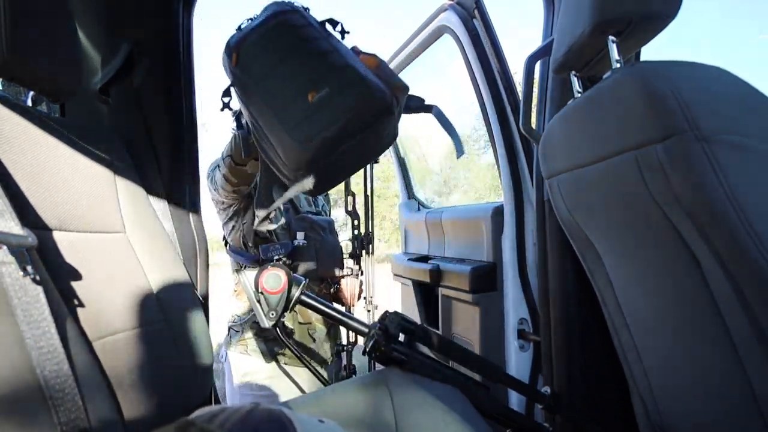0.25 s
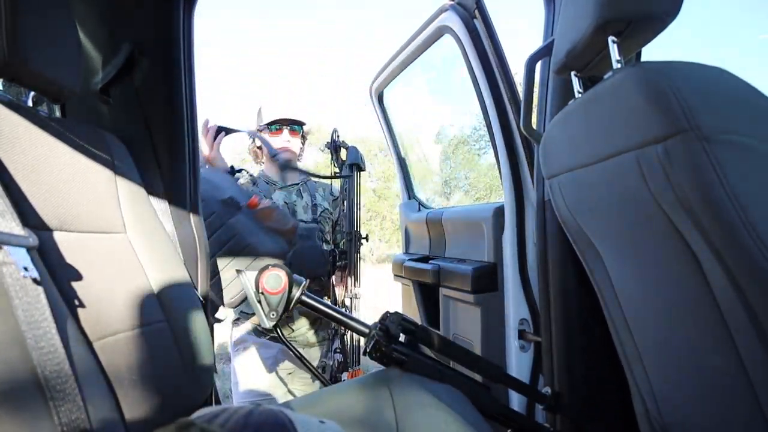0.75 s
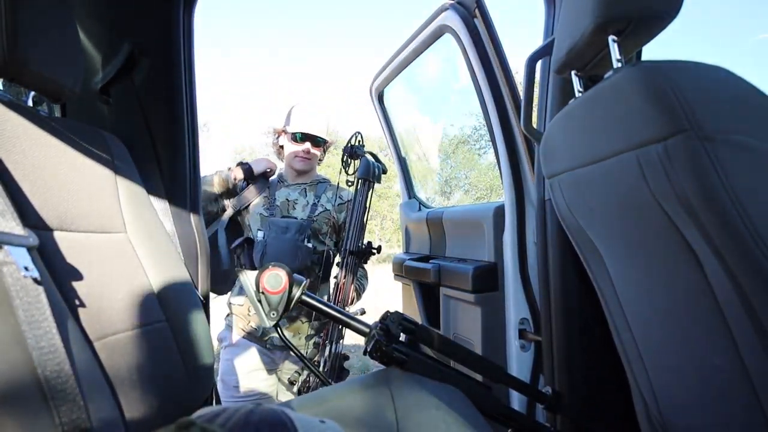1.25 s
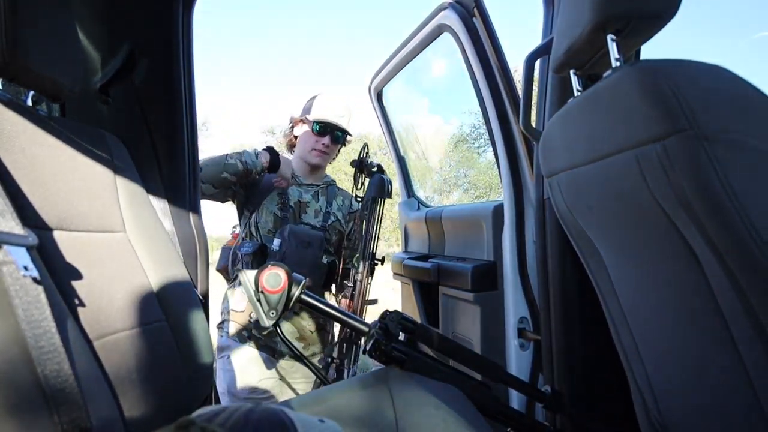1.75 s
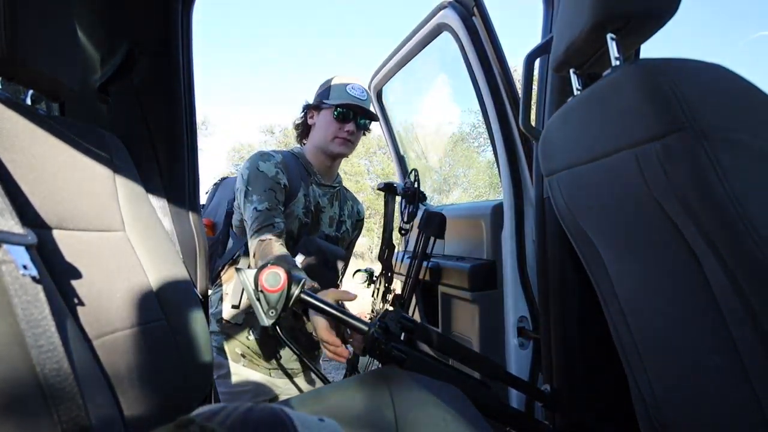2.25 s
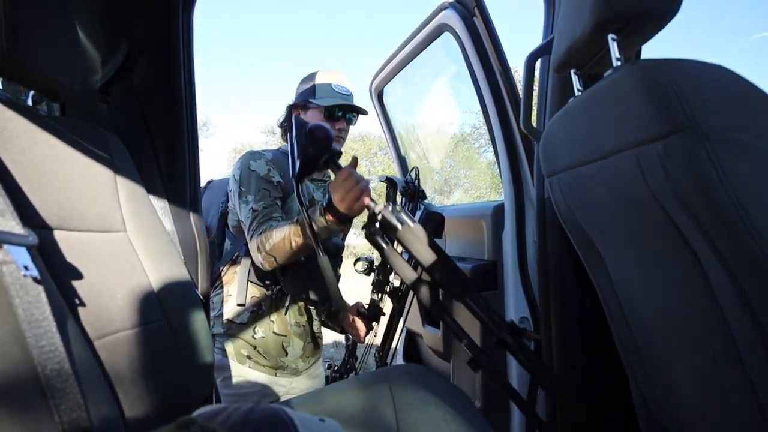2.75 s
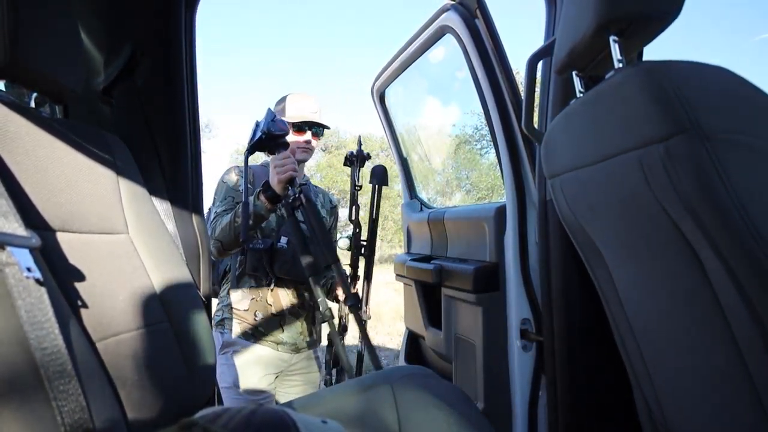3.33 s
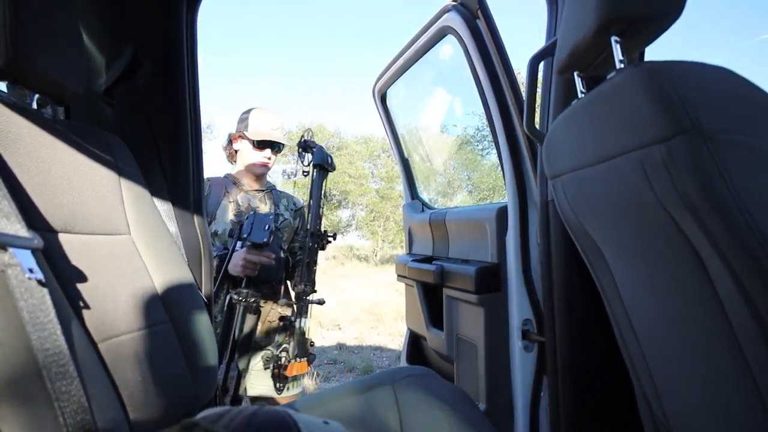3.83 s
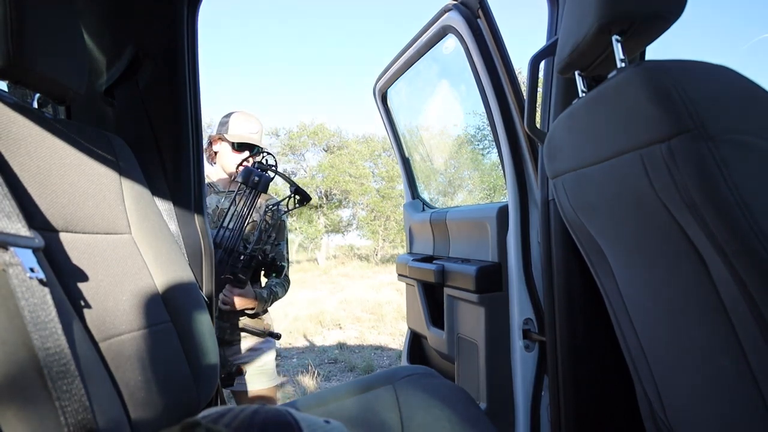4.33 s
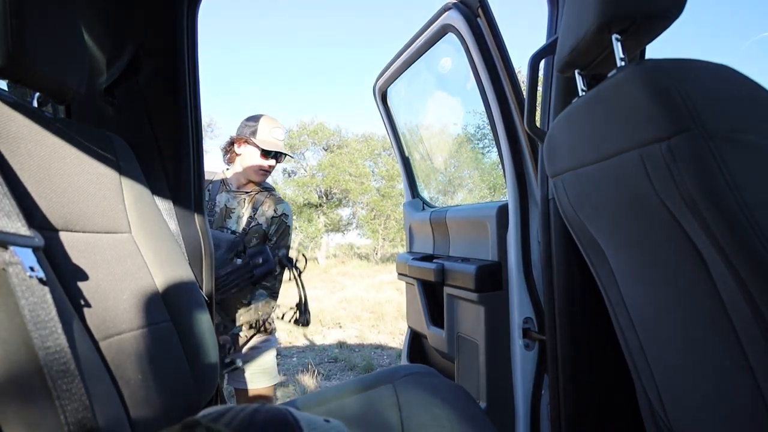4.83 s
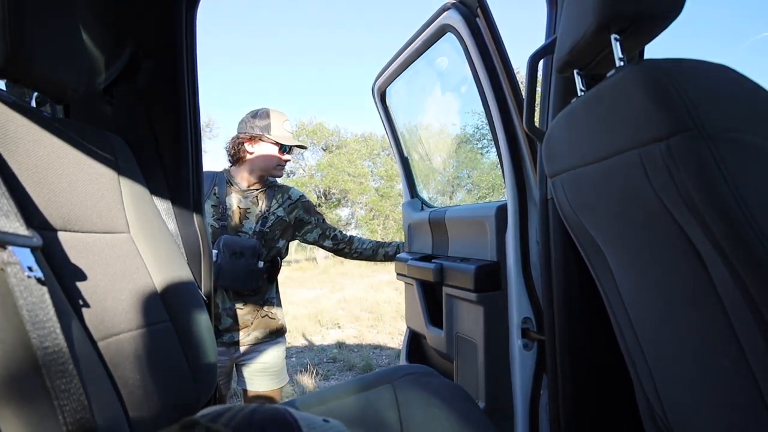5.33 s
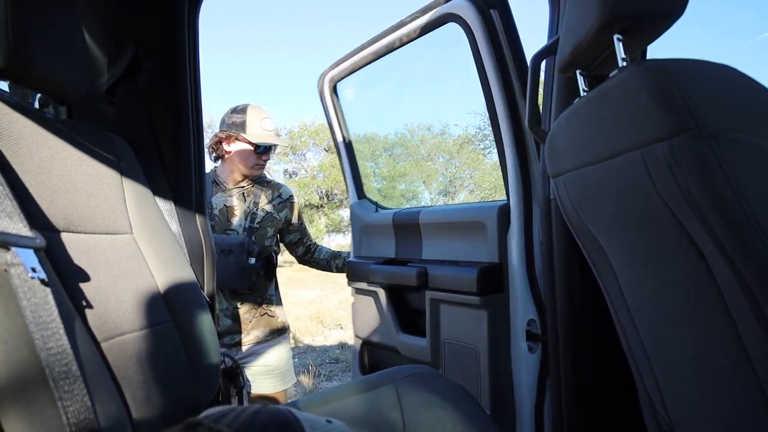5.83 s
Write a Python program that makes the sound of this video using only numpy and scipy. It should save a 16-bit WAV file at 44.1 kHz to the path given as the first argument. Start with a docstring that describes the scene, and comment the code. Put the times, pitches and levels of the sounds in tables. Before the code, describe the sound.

Inside an upholstered pickup cab with the rear door open, a nylon pack is lifted out with rustles, strap rasps, buckle ticks and a dull knock. A tripod then clacks, scrapes over the seat and drops hard on the sill, leaving a low rumble. It taps the plastic trim; faint clothing rustle follows, and the door knocks and rumbles as it begins to move. Fixed microphone in the cab, quiet outdoor air.

```python
"""Gear is unloaded through the open rear door of a pickup, heard from inside the upholstered cab.
First a nylon pack is lifted out and shouldered: its cloth rubs in dense tiny slips, straps rasp as
narrow noise, and buckles tick as damped bursts. Then a tripod clacks in ringing modes, drags over the
seat as swelling friction, drops on the sill, rocks the cab and taps the door trim. Clothes rustle on;
last, a hand takes the door, which knocks and rumbles as it starts to swing. Quiet air lies under all."""
import sys
import numpy as np
from scipy import signal
from scipy.fft import rfft, irfft
from scipy.io import wavfile
from scipy.ndimage import uniform_filter1d

SR = 44100
rng = np.random.default_rng(int(sys.argv[2]) if len(sys.argv) > 2 else 0)


def transcribe(signal):
    """Save signal, clipped to [-1, 1], as a 16-bit WAV file at the path in sys.argv[1]."""
    frames = np.atleast_2d(signal).T
    limited = np.clip(frames, -1, 1)
    pcm = np.round(limited * 32767).astype(np.int16)
    wavfile.write(sys.argv[1], SR, pcm)


N = 268128
TIME = np.arange(N) / SR
RING_TIME = TIME[:SR // 2]  # every single hit lasts half a second


def undb(db):
    """Decibels to gain."""
    return 10 ** (np.asarray(db) / 20)


def unit(x):
    """Scale to rms 1."""
    return x / np.sqrt(np.mean(x ** 2))


def log_bins(x):
    """Octave position of each bin of the spectrum of x."""
    return np.log2(np.maximum(np.arange(len(x) // 2 + 1) * SR / len(x), 1))


def colour(x, points):
    """Filter x through a curve of (frequency [Hz], gain [dB]) points, then scale to rms 1."""
    hz, db = np.transpose(points)
    gain = undb(np.interp(log_bins(x), np.log2(hz), db))
    return unit(irfft(rfft(x) * gain, len(x)))


def decay(seconds, t60):
    """Exponential decay that falls 60 dB in t60 seconds."""
    return np.exp(-np.log(1000) * seconds / t60)


def fade(t60):
    """Decay of a struck thing from the moment of the hit."""
    return decay(RING_TIME, t60)


def band_noise(hz, octaves):
    """Noise in a bell around hz, with gentle skirts."""
    x = rng.standard_normal(len(RING_TIME))
    distance = (log_bins(x) - np.log2(hz)) / octaves
    return irfft(rfft(x) / (1 + distance ** 2 / 2) ** 2, len(x))


def add(out, s, db, x):
    """Mix in a hit at time s; db is its energy taken as an rms over 10 ms."""
    start = int(s * SR)
    x = x * undb(db) * np.sqrt(SR / 100 / np.sum(x ** 2))
    out[start:start + len(x)] += x[:N - start]


def walk(rate):
    """Smooth random wander of rms 1, with rate new values per second."""
    step = max(int(SR / rate), 1)
    values = np.repeat(rng.standard_normal(N // step + 1), step)[:N]
    return unit(uniform_filter1d(values, step))


def movement(start, length):
    """Gain of one hand or arm movement: smooth attack, hold, smooth release."""
    attack_s, release_s = 0.027, 0.042
    rise = 1 + np.tanh((TIME - start) / attack_s)
    fall = 1 - np.tanh((TIME - start - length) / release_s)
    return rise * fall / 4


def movements(table):
    """Summed gain of movements (start [s], length [s], level [dB])."""
    return sum(undb(db) * movement(start, length) for start, length, db in table)


def friction(points, slips_per_s, spread_db, patchy_db, smear_t60):
    """Dense tiny slips of uneven size, gripping and easing in patches, smeared by the nearby panels."""
    chance, size, sign = rng.random(N), rng.exponential(size=N), rng.choice([-1, 1], N)
    slips = (chance < slips_per_s / SR) * sign * undb(spread_db * np.minimum(size, 4))
    slips = slips * undb(patchy_db * walk(90))
    # slips come from eight places, each with its own short echo
    place = rng.integers(0, 8, N)
    smeared = np.zeros(N)
    for k in range(8):
        path = rng.standard_normal(len(RING_TIME)) * fade(smear_t60)
        smeared += signal.oaconvolve(slips * (place == k), path)[:N]
    return colour(smeared, points)


def struck(blows, modes, crack_db, crack_hz, crack_t60, scatter_db, scatter_t60):
    """Each blow rings the modes and cracks; seats and panels close by scatter it back."""
    out = np.zeros(N)
    for s, db, contact_ms in blows:
        ring = undb(crack_db) * unit(band_noise(crack_hz, 1.08)) * fade(crack_t60)
        for k, (hz, mode_db, t60) in enumerate(modes):
            # neighbouring modes start in opposite directions
            ring += (-1) ** k * undb(mode_db) * fade(t60) * np.sin(2 * np.pi * hz * RING_TIME)
        # a longer contact pushes more softly and dulls the treble
        keep = np.exp(-1000 / (SR * contact_ms))
        ring = signal.lfilter([1 - keep], [1, -keep], ring)
        # the first scattered sound returns after 1.5 ms
        scatter = rng.standard_normal(len(ring)) * fade(scatter_t60) * (RING_TIME > .0015)
        echo = signal.fftconvolve(ring, scatter / np.linalg.norm(scatter))[:len(ring)]
        add(out, s, db, ring + undb(scatter_db) * echo)
    return out


# colour that the cab and microphone lend to every click: (frequency [Hz], gain [dB])
CLICK_COLOUR = [(100, 0), (280, 4), (450, 3), (1200, 5.5), (1800, 0), (3100, 0.5), (3900, -0.5),
                (6500, 0.5), (9000, 1.5), (10500, -7.5), (15500, -2)]


def click(hz, octaves, t60):
    """A quickly damped noise burst with a faint cab tail."""
    tail_db, tail_t60 = -31, 0.12
    envelope = fade(t60) + undb(tail_db) * fade(tail_t60)
    return colour(band_noise(hz, octaves), CLICK_COLOUR) * envelope


def clicks(table, octaves, t60):
    """Play clicks (time [s], level [dB], centre [Hz]) of one width and damping."""
    out = np.zeros(N)
    for s, db, hz in table:
        add(out, s, db, click(hz, octaves, t60))
    return out


# still outdoor air and microphone hiss: (frequency [Hz], gain [dB])
AIR_COLOUR = [(15, -39.5), (25, 3), (164, 6.5), (290, -5), (469, 1.5), (523, -0.5), (848, 0), (1110, 1),
              (1380, -4), (2230, -16), (4260, -11.5), (8350, -11), (15500, -14)]


def air():
    """Quiet open country and hiss: coloured noise that barely swells."""
    level_db, swell_db = -59.5, 0.2
    swell = undb(level_db + swell_db * walk(3.33))
    return swell * colour(rng.standard_normal(N), AIR_COLOUR)


# strokes of cloth as the pack is lifted out and shouldered and its wearer turns to the door:
# (start [s], length [s], level of the scuffing [dB], brightness [dB])
CLOTH_STROKES = [(-.02, 0.081, -49.5, -1), (.08, 0.072, -50, -4), (0.152, 0.081, -45, -3),
                 (0.26, 0.1, -52.5, -3.5), (0.457, 0.051, -54, -5), (.558, 0.35, -49.5, 5.5),
                 (0.657, 0.056, -53, -13), (0.831, 0.075, -43, 5), (0.891, 0.073, -46.5, -5),
                 (1.002, 0.32, -52.5, 2.5), (1.063, .065, -50, 10), (1.203, .03, -49, 11.5),
                 (1.267, 0.045, -44.5, 2.5), (1.32, 0.25, -49, 0), (1.581, 0.091, -40, -4.5),
                 (1.682, 0.069, -46, 0.5), (1.829, 0.13, -50.5, 0), (3.317, 0.042, -50, 7.5),
                 (3.68, 0.088, -54.5, 2.5), (4.196, .1, -51, -3.5), (4.377, 0.2, -58.5, 1),
                 (4.623, .08, -50, -5.5), (5.405, .025, -57, -13), (5.531, 0.074, -53, -11),
                 (5.701, 0.17, -54, -6.5), (5.899, .09, -58, -6)]
# colours of flapping fabric, scuffing straps, swishing nylon and crackling creases:
# (frequency [Hz], gain [dB])
FLAP_COLOUR = [(40, -10), (80, -2), (190, 3.5), (350, 3), (600, -0.5), (1200, -4), (4000, -55)]
SCUFF_COLOUR = [(150, -22.5), (450, -6.5), (850, 0), (1200, 0.5), (1600, -3), (2200, -3), (3600, -15),
                (7000, -30), (16000, -57)]
SWISH_COLOUR = [(600, -28), (2000, -4.5), (3200, 2), (4200, 0), (5500, 2.5), (7000, -2), (8800, 0),
                (11000, -11), (15500, -11)]
CRACKLE_COLOUR = [(700, -8), (1600, 3.5), (3000, 1), (6500, -2.5), (9000, -3.5), (11000, -11),
                  (15500, -9.5)]


def cloth():
    """Fabric flaps, scuffs, swishes and crackles; a brighter stroke swishes more and flaps less."""
    # levels against the scuffing, in a stroke of brightness 0
    flap_db, swish_db, crackle_db = -4.5, -3.5, -13.5
    # clothes are never quite still
    fidget_db, fidget_swell_db = -59, -0.8
    fidget = undb(fidget_db + fidget_swell_db * walk(6.6))

    def layer_gain(lean):
        """Power sum of fidgeting and strokes; lean says how brightness acts on this layer."""
        power = fidget ** 2
        for start, length, db, bright_db in CLOTH_STROKES:
            power = power + (undb(db + lean * bright_db) * movement(start, length)) ** 2
        return np.sqrt(power)

    flap, scuff, swish = layer_gain(-1), layer_gain(0), layer_gain(1)
    out = undb(flap_db) * flap * friction(FLAP_COLOUR, 1500, 1.13, 1.6, smear_t60=0.017)
    out += scuff * friction(SCUFF_COLOUR, 1800, 1.9, 1.1, smear_t60=0.016)
    out += undb(swish_db) * swish * friction(SWISH_COLOUR, 4000, 1.5, 1.6, smear_t60=0.0073)
    # sparse slips let the creases crackle in single grains
    out += undb(crackle_db) * scuff * friction(CRACKLE_COLOUR, 139.7, 3.5, 1.53, smear_t60=0.008)
    return out


# plastic clips and gear tick: (time [s], level [dB], centre [Hz])
GEAR_TICKS = [(.003, -42, 2010), (0.166, -39.5, 1600), (0.376, -54, 1490), (.674, -43, 876),
              (.985, -40, 700), (1.2, -36, 1300), (1.357, -41, 1300), (1.4114, -41, 1660),
              (1.502, -42, 1300), (1.644, -34.5, 720), (2.2395, -51, 5900), (3.338, -46.5, 2200),
              (3.571, -45.5, 2500), (3.8618, -48.5, 2780), (4.394, -49, 1984), (4.8916, -48, 5500),
              (5.206, -48.5, 2700), (5.3398, -50, 2020)]


def gear_ticks():
    """Light plastic gives broad, quickly damped clicks."""
    return clicks(GEAR_TICKS, octaves=1.17, t60=0.063)


# straps sliding through their loops: (middle [s], length [s], level [dB], centre [Hz])
STRAP_SLIDES = [(0.01, 0.054, -48.5, 1410), (1.09, 0.045, -52.5, 950), (1.19, 0.34, -51.5, 1173),
                (1.286, 0.021, -40.5, 1201), (1.435, 0.12, -48, 1498)]


def straps(width_hz=230):
    """Webbing rasps in one narrow band while it slides: slow noise carried on a tone."""
    low_pass = signal.butter(1, width_hz / 2, fs=SR, output="sos")
    grain = unit(signal.sosfilt(np.vstack([low_pass, low_pass]), rng.standard_normal((2, N))))
    out = np.zeros(N)
    for s, length, db, hz in STRAP_SLIDES:
        near = np.abs(TIME - s) < 2 * length
        t = TIME[near]
        phase = 2 * np.pi * hz * t
        rasp = grain[0, near] * np.cos(phase) + grain[1, near] * np.sin(phase)
        out[near] += undb(db) * np.exp(-2 * ((t - s) / length) ** 2) * rasp
    return out


# metal fittings: (time [s], level of the click [dB], centre of the click [Hz], ring [Hz])
CLINKS = [(.052, -46, 11900, 15100), (.956, -42, 11100, 7850), (1.066, -44, 9050, 15000),
          (1.7706, -37, 2100, 1040), (1.987, -54, 8980, 8000), (2.106, -36, 2850, 4370),
          (2.139, -40.5, 3300, 10020), (5.572, -32.5, 6100, 6520)]


def clinks():
    """Metal fittings click and ring briefly on one pitch."""
    ring_db, ring_t60 = -2.5, 0.029  # ring level against the click
    out = np.zeros(N)
    for s, db, hz, ring_hz in CLINKS:
        add(out, s, db, click(hz, octaves=1.47, t60=0.036))
        add(out, s, db + ring_db, np.sin(2 * np.pi * ring_hz * RING_TIME) * fade(ring_t60))
    return out


# soft bumps of pack, tripod, feet and hand: (time [s], level [dB], pitch [Hz])
BUMPS = [(.226, -42.5, 224), (0.281, -42, 330), (.305, -34, 375), (.903, -39, 240), (0.937, -43, 196),
         (.984, -36, 200), (1.293, -45, 196), (1.501, -42.5, 185), (1.586, -41, 120), (1.65, -42, 304),
         (2.442, -37, 185), (2.579, -28.5, 105), (4.66, -48, 224), (4.716, -45, 209), (5.417, -37.5, 170),
         (5.575, -38.5, 242), (5.932, -37.5, 236)]


def bumps():
    """Soft contact gives a few low cycles with some noise, easing in and dying away."""
    t60 = .052
    out = np.zeros(N)
    for s, db, hz in BUMPS:
        body = np.sin(2 * np.pi * hz * RING_TIME) + 0.45 * unit(band_noise(hz, 1.0))
        add(out, s, db, body * (fade(t60) - fade(t60 / 4)))
    return out


def pack_knock():
    """The pack knocks once on its way out: a narrow burst with a fainter, higher snap."""
    at_s, t60 = .3055, .026
    body = clicks([(at_s, -27, 1150)], octaves=0.51, t60=t60)
    snap = clicks([(at_s, -44, 3300)], octaves=0.42, t60=t60)
    return body + snap


# the tripod is pulled over the seat ever louder until it drops on the sill
DRAG_START_S, DRAG_END_S, DRAG_ATTACK_S = 2.44, 2.689, 0.0067


def pull(rise_db_per_s, t60):
    """Gain of the pull on the tripod: it grows steadily to the landing, then dies away."""
    before = np.maximum(DRAG_END_S - TIME, 0)
    after = np.maximum(TIME - DRAG_END_S, 0)
    onset = np.clip((TIME - DRAG_START_S) / DRAG_ATTACK_S, 0, 1)
    return onset * undb(-rise_db_per_s * before) * decay(after, t60)


# colours of the rubbing and of the seat's rumble: (frequency [Hz], gain [dB])
RUB_COLOUR = [(100, -6.5), (350, 5), (800, 1), (1300, -3), (2000, -3.5), (3100, -6), (4200, -13.5),
              (8500, -18), (11000, -25.5), (16000, -30)]
RUMBLE_COLOUR = [(25, -49), (60, -10), (100, 4), (150, 0.5), (230, 1.5), (350, -11.5), (600, -32),
                 (2000, -46)]


def drag():
    """The tripod rubs over the seat in dense slips, and the seat rumbles under it."""
    rub_db, rumble_db = -28, -29  # levels at the end of the pull
    rub = undb(rub_db) * pull(rise_db_per_s=51, t60=.15)
    rumble = undb(rumble_db) * pull(rise_db_per_s=61.5, t60=0.32)
    return (rub * friction(RUB_COLOUR, 2200, 1.8, 2.63, smear_t60=0.031)
            + rumble * friction(RUMBLE_COLOUR, 2400, 1.0, 1.7, smear_t60=0.013))


# tripod legs clacking together, then the tubes ringing again as the tripod strikes the sill: (time [s], level
# before the bass cut [dB], contact time [ms])
LEG_HITS = [(2.4635, -9.5, 0.014), (2.474, -19, 0.026), (2.479, -27.5, 0.05), (2.6596, -19.5, 0.082),
            (2.6796, -26.5, 0.11)]
# ringing modes of the leg tubes: (frequency [Hz], level [dB], t60 [s])
LEG_MODES = [(850, -25, .08), (1603, -24, 0.07), (2040, -11.5, 0.064), (2210, 1, 0.027),
             (2678, -3.5, 0.035), (2740, -15.5, 0.025), (3010, 17, 0.0044), (3320, -48, 0.026),
             (3130, -10.5, 0.027), (3256, -2, 0.079), (3530, -7, 0.036), (4200, -15, .03),
             (4510, -17, .025), (5030, -14, .03), (6370, -2.5, 0.0282), (6240, -9, 0.014),
             (7100, -10, 0.021), (7870, -8, .034), (8640, -20.5, 0.025), (9900, -46, 0.043),
             (14700, -33, 0.036)]


def leg_hits():
    """Legs clack together and later strike the sill; each hit rings the modes of their tubes."""
    legs = struck(LEG_HITS, LEG_MODES, crack_db=-7, crack_hz=4940, crack_t60=0.0289,
                  scatter_db=-8.5, scatter_t60=0.049)
    # thin tubes radiate no bass
    return signal.sosfilt(signal.butter(2, 650, "high", fs=SR, output="sos"), legs)


def foot_chatter():
    """A rubber foot sticks and slips at the seat's edge: a brief tone of wavering pitch."""
    at_s, length_s, hz, peak_db = 2.643, .014, 793, -27.5
    stick_slip = np.sin(2 * np.pi * np.cumsum(hz * (1 + 0.054 * walk(400))) / SR)
    return undb(peak_db) * np.exp(-((TIME - at_s) / length_s) ** 2) * stick_slip


# hard edges crack against the sill: (time [s], level [dB], centre [Hz])
SILL_CRACKS = [(2.659, -24, 3130), (2.68, -20, 1510), (2.725, -46, 1680)]


def sill_cracks():
    """Hard edges give short, dry bursts."""
    return clicks(SILL_CRACKS, octaves=1.13, t60=0.018)


# the tripod drops on the sill: (time [s], level [dB], contact time [ms])
SILL_BLOWS = [(2.662, -18.5, 0.094), (2.669, -27, 1.6), (2.6805, -13, 0.24), (2.6887, -23, 1.5),
              (2.733, -31, 4.8), (2.749, -37, 4)]
# ringing modes of sill and floor pan: (frequency [Hz], level [dB], t60 [s])
SILL_MODES = [(49.9, -13, 0.63), (75.4, -9, 0.21), (135.4, 3, 0.14), (170, -7, 0.18), (204, -8.5, 0.25),
              (236, 0.5, 0.14), (287, 5.5, 0.11), (410, -4.5, 0.038), (547, -1.5, 0.07), (717, 0, 0.067),
              (800, -12, 0.12), (1060, -11, 0.12), (1300, -15, 0.093), (1510, -15, .055),
              (1900, -16, 0.055), (250, 11.5, 0.013)]


def sill_blows():
    """The landing rings the low modes of the sill and floor pan."""
    return struck(SILL_BLOWS, SILL_MODES, crack_db=1.5, crack_hz=1300, crack_t60=0.098,
                  scatter_db=-16, scatter_t60=0.064)


# colour of the swaying cab and door: (frequency [Hz], gain [dB])
SWAY_COLOUR = [(15, -15), (30, -3.5), (48, -5.5), (75, -14.5), (130, -19.5), (400, -70)]


def sway():
    """Deep noise of large panels in slow motion, at rms 1."""
    return colour(rng.standard_normal(N), SWAY_COLOUR)


def cab_rock():
    """The landing rocks the cab on its springs: deep rumble that settles."""
    level_db, attack_s, t60 = -39, 0.026, 0.82
    since = TIME - DRAG_END_S
    onset = np.clip(since / attack_s, 0, 1)
    return undb(level_db) * onset * decay(np.maximum(since - attack_s, 0), t60) * sway()


# the hand slides on the tripod legs: (start [s], length [s], level [dB])
HAND_SLIDES = [(3.04, .18, -51.5), (3.32, .05, -60), (3.69, 0.21, -54)]


def grip():
    """Rubbing keeps the longer modes of the leg tubes faintly sounding."""
    rubbing = rng.standard_normal(N) * undb(4.7 * walk(60))
    tubes = np.zeros(N)
    for hz, db, t60 in LEG_MODES:
        if t60 > .02:
            resonator = signal.iirpeak(hz, hz * t60 / 6, fs=SR)
            tubes += undb(db) * signal.lfilter(*resonator, rubbing)
    # skin is soft and stirs the high modes less
    soft = signal.butter(1, 4000, fs=SR, output="sos")
    return movements(HAND_SLIDES) * unit(signal.sosfilt(soft, tubes))


# a leg taps the plastic door trim: (time [s], level [dB], contact time [ms])
TRIM_TAPS = [(3.073, -23.5, 0.034), (3.0783, -39.5, 0.034)]
# ringing modes of the door trim: (frequency [Hz], level [dB], t60 [s])
TRIM_MODES = [(890, -25, 0.089), (1116, -17.5, 0.066), (1240, -10, 0.063), (1600, -13, 0.026),
              (2010, -11.5, 0.034), (2310, -0.5, 0.014), (2495, -1, 0.035), (2700, -0.5, 0.023),
              (3140, 0, 0.024), (5550, -41, 0.44), (6360, -8, 0.022), (6900, -7, 0.017), (8600, -12, 0.034),
              (10300, -19, .035)]


def trim_taps():
    """A leg taps the door trim on the way out and rings its plastic."""
    return struck(TRIM_TAPS, TRIM_MODES, crack_db=-2.5, crack_hz=5000, crack_t60=0.01,
                  scatter_db=-10, scatter_t60=0.05)


# the door is tugged, then swung: (start [s], length [s], level [dB])
DOOR_PULLS = [(5.405, .035, -41), (5.495, .045, -40), (5.6, .75, -56.5)]


def door_rumble():
    """The moving door rumbles deeply with each pull."""
    return movements(DOOR_PULLS) * sway()


# the handle is taken and the hinge check lets go: (time [s], level [dB], centre [Hz])
DOOR_KNOCKS = [(5.4182, -46.5, 520), (5.452, -52, 1510), (5.5294, -47, 3000), (5.541, -44, 2480),
               (5.5616, -40, 1070), (5.5718, -28, 2420), (5.582, -38, 580), (5.9069, -46.5, 1200),
               (5.9329, -33, 800)]


def door_knocks():
    """Handle and hinge check knock in broad, damped bursts."""
    return clicks(DOOR_KNOCKS, octaves=1.64, t60=.033)


def scene():
    """Everything as it reaches the one microphone in the cab."""
    pack = cloth() + gear_ticks() + straps() + clinks() + bumps() + pack_knock()
    tripod = drag() + leg_hits() + foot_chatter() + sill_cracks() + sill_blows()
    tripod += cab_rock() + grip() + trim_taps()
    door = door_rumble() + door_knocks()
    return (air() + pack + tripod + door)[None]


def record(dry):
    """The recorder clips whatever exceeds full scale and cuts the top."""
    top_hz = 15900
    top_cut = signal.ellip(10, .1, 80, top_hz, fs=SR, output="sos")
    return signal.sosfilt(top_cut, np.clip(dry, -1, 1))


dry = scene()
out = record(dry)
transcribe(out)
```